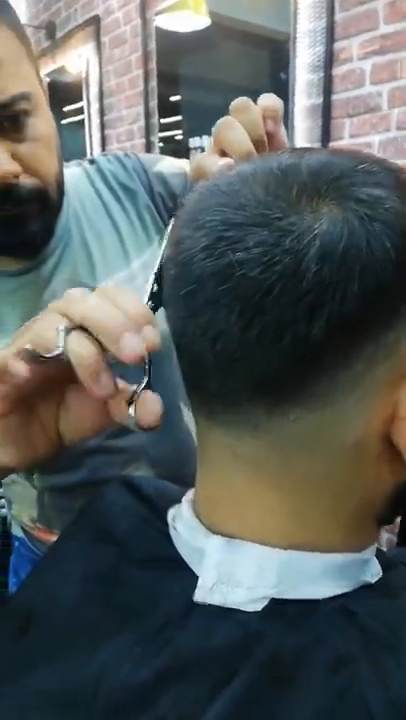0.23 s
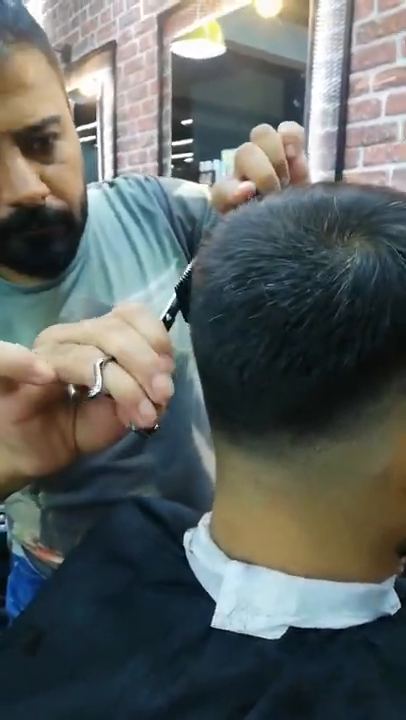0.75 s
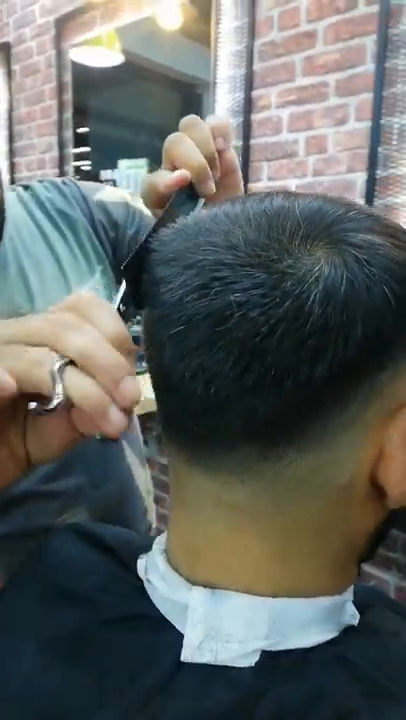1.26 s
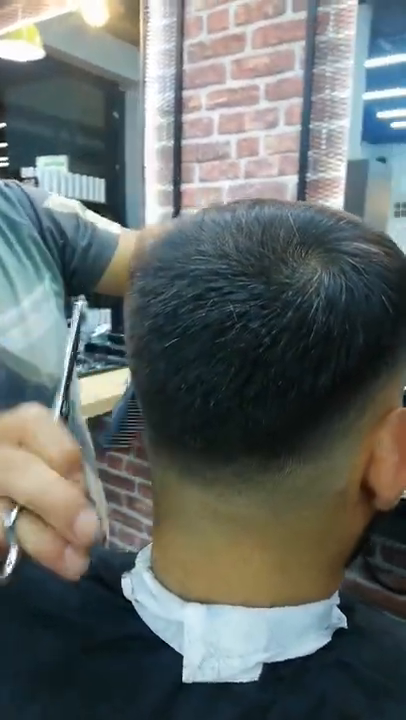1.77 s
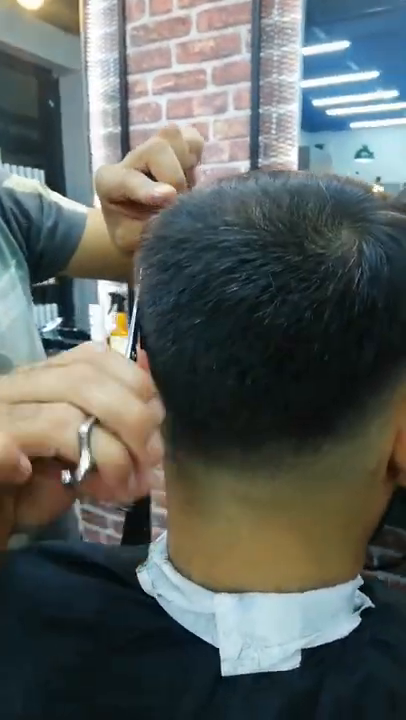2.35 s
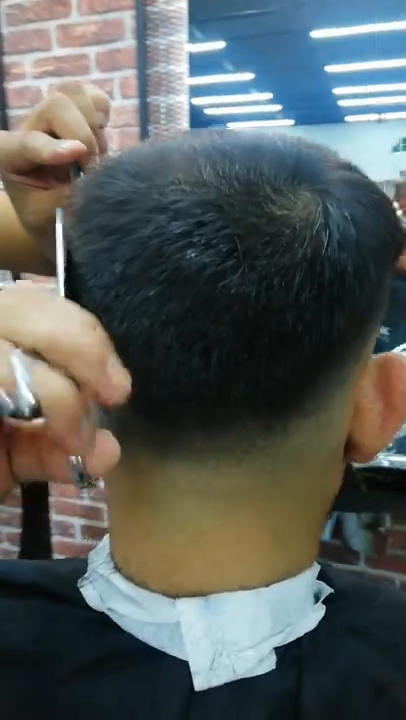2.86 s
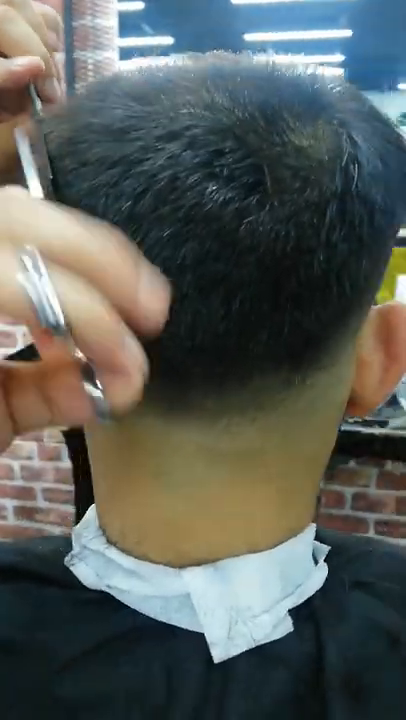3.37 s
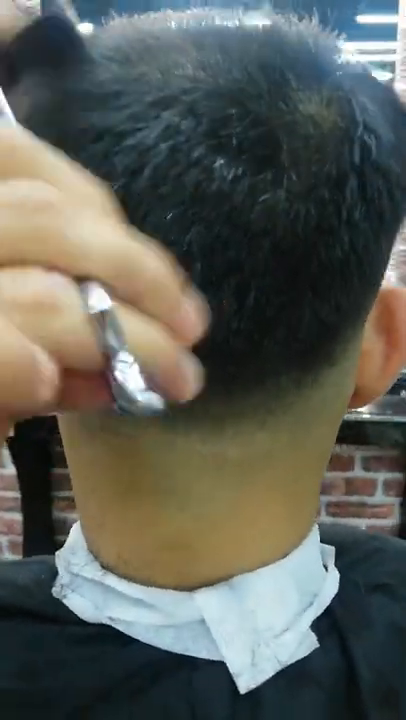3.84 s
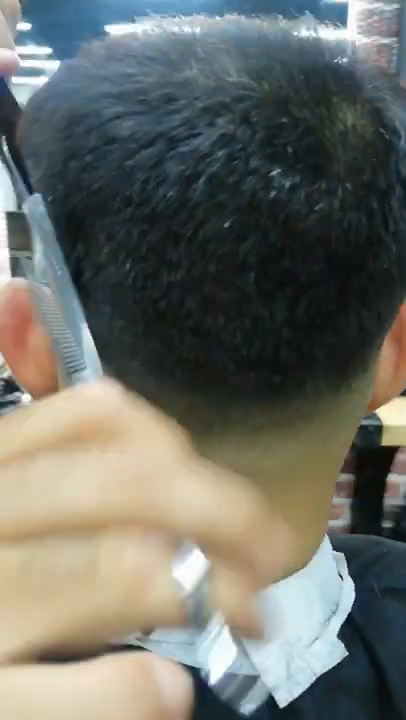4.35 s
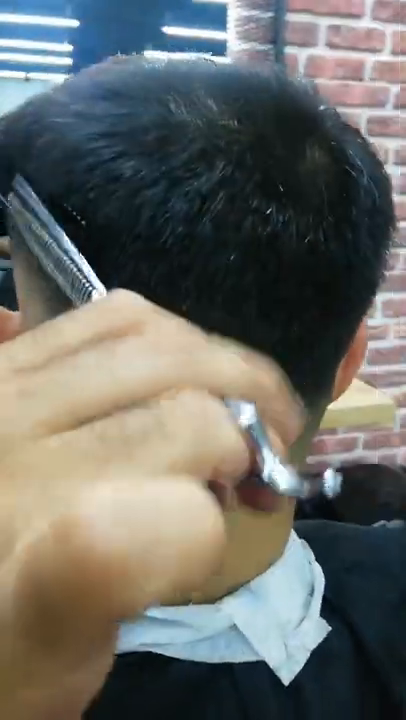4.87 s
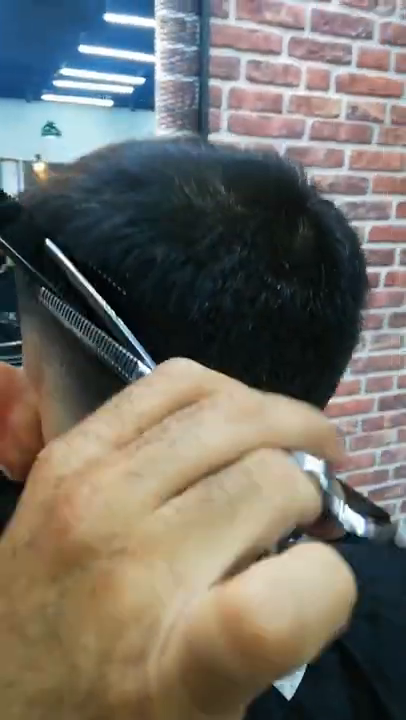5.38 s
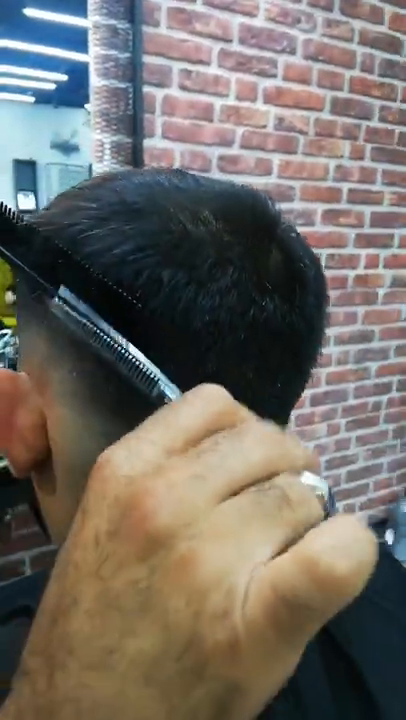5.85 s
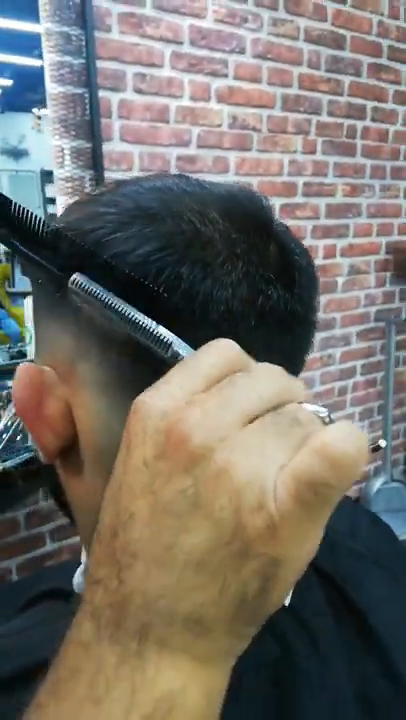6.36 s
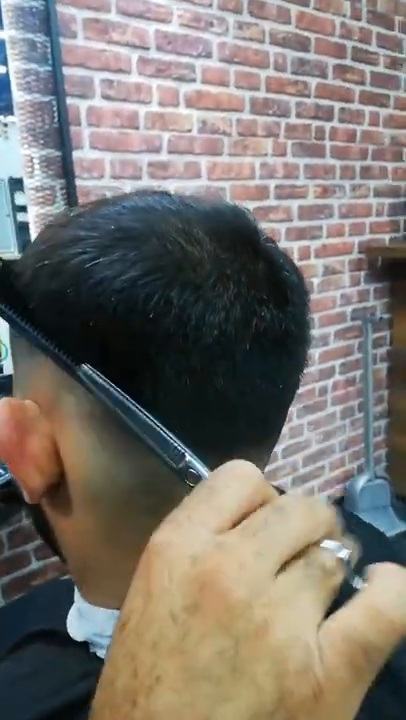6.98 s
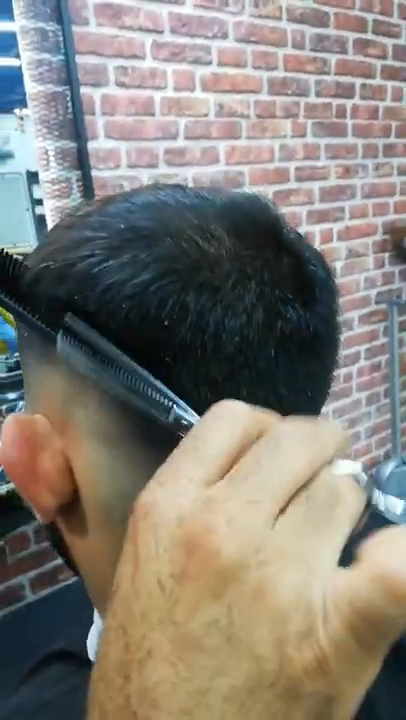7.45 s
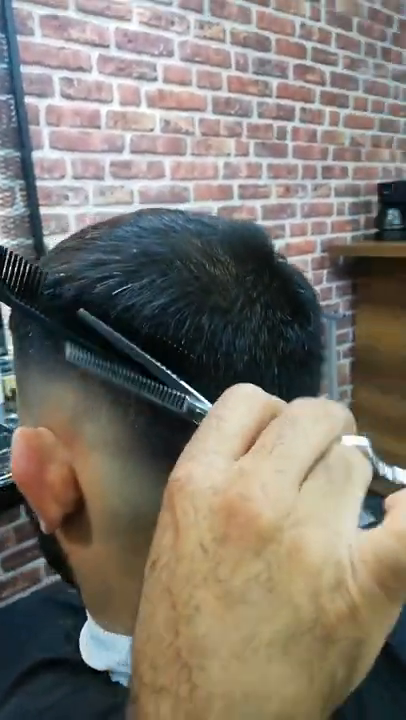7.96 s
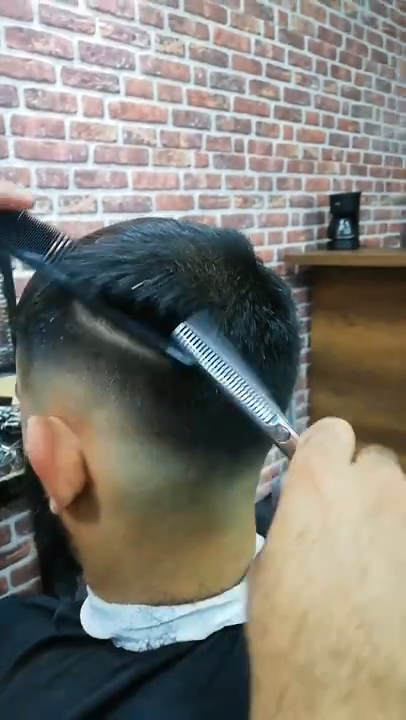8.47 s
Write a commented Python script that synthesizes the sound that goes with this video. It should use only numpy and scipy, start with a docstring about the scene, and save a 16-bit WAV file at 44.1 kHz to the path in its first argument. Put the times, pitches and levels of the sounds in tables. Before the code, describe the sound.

Very close steel scissors, louder on the left, snip in quick regular rhythm: a bright tick as the blades part, a tiny crunch of hair, a metallic clash and a dry handle clack. Around two seconds the blades only scrape in the air, then cutting resumes. A comb rustles faintly. Underneath, a soft steady low hum and room noise; the hard-walled shop adds a brief bright echo.

```python
"""Barber's scissors over a comb

Steel scissors snip hair over a comb, close to a handheld two-microphone recorder in a barbershop.
The blades part with a tick or scrape in the air; in a snip they crunch through hair, clash and knock shut.
Snaps are single impulses with noisy chatter, crunches and scrapes are swells of tiny grains, and both ring
through metallic colours. The comb rustles, and the shop rings briefly with decaying noise.
Beneath lie a steady hum of low sines and filtered noise: rumble, hiss and a wash that swells and fades."""
import sys
import numpy as np
from scipy import signal
from scipy.fft import rfft, irfft, next_fast_len
from scipy.io import wavfile
from scipy.ndimage import uniform_filter1d

SR = 44100
rng = np.random.default_rng(int(sys.argv[2]) if len(sys.argv) > 2 else 0)


def pcm_store(signal):
    """Save signal as 16-bit PCM."""
    levels = np.round(np.clip(np.atleast_2d(signal), -1, 1) * 32767)
    wavfile.write(sys.argv[1], SR, levels.astype(np.int16).T)


N = 384463

# Snips through hair; levels are before each layer's trim. Each row: blades shut in seconds, bite earlier by
# seconds, bite spread in seconds, bite level in dB, blade clash level in dB, handle knock level in dB,
# knock tilt in dB per octave, steel ring in dB, lean to the left in dB.
SNIPS = [(.16, .027, .005, -33.5, -29, -36, 14, -1, 3),
         (0.4716, 0.051, 0.0068, -32.5, -31.5, -36, 3, 0, -3),
         (.7324, 0.019, 0.0077, -36, -27.5, -43.5, 5, -0.5, -1),
         (1.0371, .033, 0.0073, -33.5, -37, -41.5, 5, 5, 2),
         (1.264, .014, 0.0081, -34.5, -39, -58, -3, 2, 10),
         (1.4952, 0.0043, .0045, -36.5, -41, -48.5, -9, -2, 2),
         (2.4892, 0.024, 0.0061, -35, -24.5, -42, 6, 4.5, 7),
         (2.768, .017, 0.0067, -37.5, -37, -44, 0, 3, 2), (3.044, 0.011, 0.0072, -39, -31, -40, 3, -2, -4),
         (3.3349, 0.022, 0.0061, -39, -29, -39.5, 8, 0.5, -3),
         (3.6147, 0.027, 0.0051, -37.5, -29.5, -37.5, 0, -3, -4),
         (3.8286, .0045, 0.0035, -32, -40, -45, -2, -6, -4),
         (4.127, .015, 0.0047, -31, -39, -41.5, -5, -2, 0),
         (4.3514, 0.022, 0.0043, -38.5, -34.5, -41.5, -2, 0, 3),
         (4.7442, 0.0049, 0.0043, -30.5, -35.5, -38.5, 12, -1, -3),
         (5.042, 0.035, 0.0028, -32, -25, -32, -2, 1.5, -3),
         (5.2932, .009, 0.0025, -29.5, -45, -39, -6, 0, 7),
         (5.557, 0.0044, 0.0026, -30.5, -39, -40.5, -5, 5, -1),
         (5.8148, 0.0036, 0.0041, -37.5, -30, -43.5, -6, 2.5, 3),
         (6.0877, 0.0049, .0037, -36, -41, -40, 1, -1, -3),
         (6.3647, 0.023, 0.0039, -38, -28.5, -38.5, -4.5, 7.5, -1),
         (6.6, 0.0081, 0.0032, -28.5, -49, -43.5, -1, 5, 1),
         (7.3274, 0.0015, 0.002, -26, -27.5, -33, 4, 10, -7),
         (7.629, .044, 0.0055, -41, -33, -32, 4.5, -3, -8),
         (7.8887, 0.03, 0.0092, -41, -28, -34, -1, -3, -4),
         (8.1298, 0.022, 0.0043, -33.5, -31, -35, -0.5, -2, -5)]
# Blades working in hair, at the two microphones. Each row: frequency in Hz, relative left and right level in dB.
CUT_COLOUR = [(1480, -23.5, -50), (2970, -16, -23), (3770, -15.5, -24), (5340, -11, -28), (6200, -7.5, -18),
              (6900, -10.5, -26), (7770, -2, -20), (8080, -11.5, -27), (8690, 3, -13), (10350, -10.5, -28),
              (11900, -14, -25), (14100, -23, -31), (15400, -22, -34), (16000, -51, -59)]
# The last hairs are sheared as the blades clash, this many seconds before the stop
CLASH_LEAD_S = .001
# Brightness of the clash (dB per octave) and its extra steel ring (dB)
CLASH_TILT_DB, CLASH_RING_DB = 1, 2


def amp(db):
    """Decibels to gain."""
    return 10 ** (np.asarray(db) / 20)


def evened(x):
    """Scales to rms 1."""
    return x / np.sqrt(np.mean(x ** 2) + 1e-20)


def read(points, hz):
    """Every column of a spectrum table, interpolated over log frequency."""
    f, *columns = np.transpose(points)
    return np.squeeze([np.interp(np.log(hz + 1), np.log(f + 1), c) for c in columns])


def follow(curve):
    """A time curve at every sample."""
    return np.interp(np.arange(N) / SR, *np.transpose(curve))


def add(mix, s, sound):
    """Mixes a two-channel sound in at time s, cut off at the end of the mix."""
    part = mix[:, max(round(s * SR), 0):][:, :sound.shape[1]]
    part += sound[:, :part.shape[1]]


def below(x, edge_hz):
    """The part of a sound under an edge, without phase shift."""
    return signal.sosfiltfilt(signal.butter(6, edge_hz, fs=SR, output="sos"), x)


def wander(slow_hz, fast_hz, count=20):
    """Slow drift of rms 1: sines between two rates in random phase, the slow ones stronger."""
    t = np.linspace(0, N / SR, N // 128)
    rates = np.geomspace(slow_hz, fast_hz, count)
    drift = sum(np.sin(2 * np.pi * (f * t + rng.random())) / np.sqrt(f) for f in rates)
    return follow(np.c_[t, evened(drift)])


def diffuse(spectrum):
    """Shaped room noise of rms 1: alike at both microphones in the bass, unrelated in the treble."""
    # Correlation of the microphones. Each row: frequency in Hz, likeness from -1 to 1.
    likeness = [(100, 1), (180, .8), (300, .85), (450, 0), (650, -.4), (1000, .07), (1600, .1), (4000, 0)]
    # Tonal balance of the microphones. Each row: frequency in Hz, left minus right in dB.
    balance = [(150, 0), (450, -2), (800, 0), (1700, -5), (3200, -2.5), (8000, -7.5)]
    size = next_fast_len(N, real=True)
    hz = np.fft.rfftfreq(size, 1 / SR)
    left, other = rfft(rng.standard_normal((2, size)))
    same = np.clip(read(likeness, hz), -1, 1)
    right = same * left + np.sqrt(1 - same ** 2) * other
    gain = amp(read(spectrum, hz) + np.outer([.5, -.5], read(balance, hz)))
    return evened(irfft(np.array([left, right]) * gain, size)[:, :N])


def background(wash_db=0.88, rumble_db=-2.5, upper_db=-0.6, lumps_db=0.53, rumble_hz=70, upper_hz=172):
    """Lumpy room rumble in two registers, steady room noise, a far wash and a thin hiss, all filtered noise."""
    # Room noise spectrum. Each row: frequency in Hz, relative density in dB.
    floor_spectrum = [(20, -19), (30, -20), (42, 4.5), (56, 5.5), (70, -15.5), (95, 5), (120, -3.5),
                      (145, 0.5), (175, -4), (300, -6.5), (490, -14), (850, -13.5), (3500, -36.5),
                      (7000, -39)]
    # Thin hiss spectrum. Each row: frequency in Hz, relative density in dB.
    hiss_spectrum = [(1500, -0.5), (4000, 4.5), (7000, -4), (9000, 6), (11000, -9), (15000, -11),
                     (16200, -49)]
    # Far wash spectrum. Each row: frequency in Hz, relative density in dB.
    wash_spectrum = [(200, -0.5), (350, 0.5), (520, -7), (800, 3), (1100, 0.5), (1400, 0.5), (1950, 0),
                     (2400, -7), (3300, -16.5), (6000, -42)]
    # Swell of the far wash. Each row: time in seconds, level before trim in dB.
    wash_level = [(0, -52.5), (1.0, -55), (1.9, -55.5), (3.9, -49), (4.6, -50), (6.2, -58.5), (6.72, -54),
                  (7.2, -58.8), (8.72, -58.5)]
    # Swell of the deepest rumble. Each row: time in seconds, level before trim in dB.
    rumble_level = [(0, -60), (1.6, -58), (2.5, -69), (4.55, -54.5), (5.15, -65), (6.6, -56), (7.8, -50),
                    (8.72, -54)]
    # Swell of the upper rumble. Each row: time in seconds, level before trim in dB.
    upper_level = [(0, -55.5), (1.55, -51), (2.6, -51.5), (3.4, -53.5), (4.1, -51), (5.0, -54.5),
                   (6.9, -55.5), (8.72, -54.5)]
    floor_db, hiss_db = -49.5, -62.5

    floor = diffuse(floor_spectrum + [(16000, -63)])
    deep, low = below(floor, rumble_hz), below(floor, upper_hz)
    rumble = amp(follow(rumble_level) + rumble_db + lumps_db * wander(1.5, 3.8)) * evened(deep)
    upper = amp(follow(upper_level) + upper_db + lumps_db * wander(2.6, 7)) * evened(low - deep)
    room = amp(floor_db) * (floor - low)
    wash = amp(follow(wash_level) + wash_db) * diffuse(wash_spectrum)
    hiss = amp(hiss_db) * diffuse(hiss_spectrum)
    return room + rumble + upper + wash + hiss


def hum(waver=0.075, flutter_db=0.47, start_db=-48, rise_db_per_s=0.31):
    """An appliance drones near multiples of the mains frequency; phase (waver, radians) and level drift a little."""
    # Partials of the drone. Each row: frequency in Hz, relative level in dB.
    partials = [(100, -19), (199.9, 7), (300, -22)]
    t = np.arange(N) / SR
    drift = waver * wander(0.267, 3.5)
    drone = sum(amp(db) * np.sin(2 * np.pi * hz * t + drift) for hz, db in partials)
    level_db = start_db + rise_db_per_s * t + flutter_db * wander(0.98, 6.8)
    return amp(level_db) * evened(drone)


def shop(x, level_db=0, build_up=0.0008, size=256):
    """Dense noise reflections from brick and mirrors build up in about a millisecond; each band dies at its own speed."""
    # The shop's echo by band. Each row: frequency in Hz, level in dB, 60 dB decay time in seconds.
    bands = [(500, -8.5, 0.53), (2000, -0.5, 0.39), (4200, -4, 0.33), (6600, -11.5, 0.4), (9200, -11, 0.33),
             (11900, -11, 0.35), (16100, -8, 0.15)]
    taps = rng.standard_normal((2, SR)) * (1 - np.exp(-(np.arange(SR) / SR / build_up) ** 2))
    hz, t, z = signal.stft(taps, SR, nperseg=size)
    db, t60 = read(bands, hz)[:, :, None]
    unit = np.sqrt(2 * np.log(1000) / (t60 * SR))  # decay energy made equal for short and long bands
    decay = np.exp(-np.log(1000) * t / t60)
    tail = signal.istft(z * unit * amp(db + level_db) * decay, SR, nperseg=size)[1]
    return signal.fftconvolve(x[None], tail, axes=1)[:, :N]


def coloured(drive, colour, extra_db=lambda hz: 0, size=1024):
    """Rings a drive through a causal minimum-phase colour; the left channel gets energy 1."""
    hz = abs(np.fft.fftfreq(size, 1 / SR))
    log_gain = np.log(amp(read(colour, hz) + extra_db(hz)))
    response = np.fft.ifft(np.exp(signal.hilbert(log_gain).conj())).real[:, :size // 2]
    sound = signal.fftconvolve(np.atleast_2d(drive), response, axes=1)
    return sound / np.linalg.norm(sound[0])


def steel(ring_db, tilt_db):
    """Colour of one contact: its brightness above 3 kHz, and how hard it drives the blades' main resonance."""
    centre_hz, width_hz = 9320, 370

    def extra_db(hz):
        ring = ring_db * np.exp(-.5 * ((hz - centre_hz) / width_hz) ** 2)
        return ring + tilt_db * np.log2(np.maximum(hz, 3000) / centre_hz)
    return extra_db


def leaning(sound, lean_db):
    """The right microphone is more or less shaded from the scissors."""
    return sound * amp([[0], [-lean_db]])


def comb(grains_per_s=1300, rub=0.58, level_db=2.0, clump_db=4.0, size=500):
    """Tufts of hair flick off the teeth of the comb: sparse grains and friction noise in uneven clumps."""
    # Comb sliding through hair. Each row: time in seconds, level before trim in dB.
    comb_level = [(0, -56.5), (.85, -61), (1.7, -68.5), (3.2, -65.5), (4.2, -58), (4.6, -68.5), (6.1, -73),
                  (6.55, -63.5), (7.05, -71), (7.5, -63), (8.0, -61.5), (8.25, -71), (8.72, -61)]
    flicks = rng.standard_normal(N) * (rng.random(N) < grains_per_s / SR)
    tufts = amp(clump_db * evened(uniform_filter1d(rng.standard_normal(N), size)))
    drive = tufts * (evened(flicks) + rub * rng.standard_normal((2, N)))
    rustle = coloured(drive, CUT_COLOUR, steel(-5, -2.4))[:, :N]
    return amp(follow(comb_level) + level_db) * evened(rustle)


def strokes(rows, colour, grains_per_s, grain_spread_db, rub, skirt, vary_db, level_db):
    """Swells of tiny snaps over smooth friction, each stroke with its own random shift of colour."""
    out, knots_hz = np.zeros((2, N)), np.linspace(2000, 16000, 24)
    t = np.arange(-.04, .04, 1 / SR)
    for s, spread, db, lean_db, tilt_db, ring_db in rows:
        u = t / max(spread, 20 / SR)
        swell = np.exp(-(u / 2) ** 2) + skirt * np.exp(-abs(u) / 3)  # light rub before and after the peak
        sizes = amp(grain_spread_db * np.minimum(rng.exponential(1, len(t)), 3))
        snaps = sizes * rng.choice([-1, 1], len(t)) * (rng.random(len(t)) < grains_per_s / SR)
        drive = swell * (evened(snaps) + rub * rng.standard_normal((2, len(t))))
        shift_db = vary_db * rng.standard_normal(len(knots_hz))
        contact_db = steel(ring_db, tilt_db)
        sound = coloured(drive, colour, lambda hz: contact_db(hz) + np.interp(hz, knots_hz, shift_db))
        length_gain = np.linalg.norm(swell) / swell.max()  # longer strokes carry more energy
        add(out, s + t[0], amp(db + level_db) * length_gain * leaning(sound, lean_db))
    return out


def scrapes(tilt_db=-1.0, ring_db=4.0):
    """Between cuts the empty blades rub along each other, a dense swell of grains in a steely colour."""
    # Bare blades passing in the air. Each row: middle in seconds, spread in seconds, level before trim in dB,
    # lean to the left in dB.
    passes = [(1.677, 0.006, -39.5, 1), (1.758, 0.0042, -34, 1), (1.91, 0.0051, -39, -1),
              (1.997, 0.0043, -37.5, -1), (2.122, 0.0053, -45, 0), (2.219, 0.0048, -47, -3),
              (4.007, 0.0057, -46.5, -4), (4.24, 0.0063, -37.5, 3), (4.461, 0.0047, -40, 1),
              (4.674, 0.0016, -49, -1), (6.795, 0.0065, -41, -8), (6.922, 0.017, -52, -7),
              (8.295, 0.0034, -42, -5), (8.384, .009, -40, -4), (8.517, .0046, -39.5, -2),
              (8.599, 0.012, -41.5, -6)]
    # Bare blades at the two microphones. Each row: frequency in Hz, relative left and right level in dB.
    scrape_colour = [(2000, -15.5, -35), (4000, -19.5, -28), (6000, -12, -17), (6870, -12, -31),
                     (7420, 4.5, -11), (8060, -9.5, -14), (8550, 5.5, -18), (9040, -4.5, -14),
                     (9940, -6, -18), (11400, -14, -25), (11840, 0.5, -11), (13000, -10.5, -21),
                     (15400, -15, -23), (16200, -49, -44)]
    rows = [(*row, tilt_db, ring_db) for row in passes]
    return strokes(rows, scrape_colour, grains_per_s=1800, grain_spread_db=4.0,
                   rub=0.45, skirt=.35, vary_db=2.0, level_db=-.5)


def contact(db, chatter, chatter_s, ring_db, tilt_db, chatter_stretch=2.4, size=500):
    """Edge meets or leaves edge: one snap, then a short decaying noise of chatter, ringing in steel."""
    # Touching edges at the two microphones. Each row: frequency in Hz, relative left and right level in dB.
    tick_colour = [(1200, -43, -48), (2830, -21, -27), (3900, -16, -36), (4260, -15, -20),
                   (5430, -6.5, -22), (6100, -5, -13), (6550, -9, -23), (7800, -1.5, -30), (9300, 5, -9),
                   (10300, -3.5, -20), (11950, -9.5, -25), (13100, -11.5, -24), (15000, -18, -28),
                   (16000, -24, -64)]
    t, hold = np.arange(size) / SR, max(chatter_s, 1 / SR)
    decay = np.exp(-t / (hold * chatter_stretch))
    drive = chatter * np.sqrt(hold * SR) * rng.standard_normal((2, size)) * decay
    drive[:, 0] = 1  # the snap
    return amp(db) * np.sqrt(SR * 0.0053) * coloured(drive, tick_colour, steel(ring_db, tilt_db))


def ticks(level_db=0.2, ring_db=-1.5, ring_vary_db=2, chatter=.052):
    """The edges let go of each other with a snap and faint chatter; the steel ring varies at random."""
    # Blade ticks, mostly as the blades part before a snip. Each row: start in seconds, level before trim in dB,
    # chatter time before stretch in seconds, tilt in dB per octave, lean to the left in dB.
    partings = [(.048, -31.5, 0.00049, -1.5, 2), (0.1091, -33.5, 0.0011, -2.5, 4),
                (0.3405, -35.5, 0.0014, -2.5, -3), (0.6244, -35, 0.0012, -6, 2),
                (.9171, -39, 0.00047, -5, 0), (1.1963, -35, 0.00083, -7.5, 0), (1.7234, -31, 0.00076, 1, 9),
                (1.9808, -40.5, .0014, -2, -3), (2.1865, -37, 0.0017, -2.5, 1),
                (2.3858, -40.5, 0.0011, -2, 3), (2.678, -45.5, .001, 2, -7), (2.726, -41, 0.0008, -5, -2),
                (2.9581, -26.5, .0007, 2.5, 1), (3.2511, -38.5, .0008, -8.5, -3),
                (3.5303, -32, 0.00053, -4.5, -1), (3.7837, -46.5, .0011, -7, -7),
                (4.056, -36, 0.0007, -7, -2), (4.0904, -35, 0.0018, 7, -2), (4.319, -34, 0.0012, 1, -5),
                (4.5197, -45, 0.00088, -3, 1), (4.952, -28.5, 0.0011, -1.5, 12),
                (4.992, -40, .0005, -2, 29), (5.2282, -28, 0.00075, -1.5, -5),
                (5.4962, -28.5, 0.00094, 5, 15), (5.5348, -35, .0007, -1, -2),
                (5.7223, -34.5, 0.0014, 0, 7), (5.766, -29, 0.00036, 0.5, 12),
                (6.0217, -25.5, 0.00049, .5, 1), (6.2755, -28, 0.00085, 3, 12),
                (6.5363, -43, .0008, -5, -4), (6.636, -39, 0.00042, -6, -6), (6.901, -35.5, 0.0017, 5, -6),
                (7.089, -38.5, .0015, 6, -2), (7.1986, -37.5, .00085, -2, -1),
                (7.2918, -36.5, 0.0012, 4, 0), (7.4963, -39, .0004, 2, -14),
                (7.7786, -30.5, 0.00089, 1.5, -3), (8.0409, -30.5, 0.00018, -1.5, 4),
                (8.1668, -39, 0.00062, -10.5, -10), (8.5814, -40.5, .0009, -1, -9)]
    out = np.zeros((2, N))
    for s, db, chatter_s, tilt_db, lean_db in partings:
        tick_ring_db = ring_db + ring_vary_db * rng.standard_normal()
        sound = contact(db + level_db, chatter, chatter_s, tick_ring_db, tilt_db)
        add(out, s, leaning(sound, lean_db))
    return out


def handle_knocks(level_db=2.0, vary_db=2, rattle=0.093, rattle_s=0.0029, size=300):
    """The handles land on their stop: a short, dry clack and a trace of rattle, each in its own random colour."""
    # Handles at the two microphones. Each row: frequency in Hz, relative left and right level in dB.
    knock_colour = [(300, -27, -46), (830, -1.5, -6.5), (1240, -12, -9.5), (1880, 4.5, -0.5),
                    (2420, 6.5, 2.5), (3180, -3, -9.5), (3480, -10, -22.5), (4200, -8.5, -23),
                    (6960, -26.5, -28.5)]
    out, t = np.zeros((2, N)), np.arange(size) / SR
    knots_hz = np.linspace(600, 5000, 12)
    for stop, _, _, _, _, knock_db, tilt_db, _, _ in SNIPS:
        drive = rattle * rng.standard_normal((2, size)) * np.exp(-t / rattle_s)
        drive[:, 0] = 1  # the clack
        shift_db = vary_db * rng.standard_normal(len(knots_hz))

        def extra_db(hz):
            return tilt_db * np.log2(np.clip(hz, 1000, 3500)) + np.interp(hz, knots_hz, shift_db)
        sound = coloured(drive, knock_colour, extra_db)
        add(out, stop, amp(knock_db + level_db) * np.sqrt(SR * 0.0026) * sound)
    return out


def clashes(chatter=0.11, chatter_s=.001, lean_shift_db=-5, level_db=-1.5):
    """The blades snap together as they shut, their lean moved toward the right microphone."""
    out = np.zeros((2, N))
    for stop, _, _, _, clash_db, _, _, ring_db, lean_db in SNIPS:
        sound = contact(clash_db + level_db, chatter, chatter_s, ring_db + CLASH_RING_DB, CLASH_TILT_DB)
        add(out, stop - CLASH_LEAD_S, leaning(sound, lean_db + lean_shift_db))
    return out


def cuts(bite_tilt_db=2.5, shear_spread_s=0.0015, shear_db=-2):
    """Each snip crunches through the tuft in a swell of grains, then shears the last hairs as it shuts."""
    rows = []
    for stop, lead, spread, bite_db, clash_db, _, _, ring_db, lean_db in SNIPS:
        bite = (stop - lead, spread, bite_db, lean_db, bite_tilt_db, ring_db)
        shear = (stop - CLASH_LEAD_S, shear_spread_s, clash_db + shear_db, lean_db,
                 CLASH_TILT_DB, ring_db + CLASH_RING_DB)
        rows += [bite, shear]
    return strokes(rows, CUT_COLOUR, grains_per_s=1300, grain_spread_db=6.0,
                   rub=.5, skirt=0.29, vary_db=3.0, level_db=0.5)


def scene():
    """The scissors, louder at the left microphone, in the humming shop."""
    blades = ticks() + cuts() + clashes() + scrapes() + comb()
    handles = handle_knocks()
    left, right = blades + handles
    right_lead = 27  # samples by which the direct sound reaches the right microphone earlier
    direct = np.array([left, np.roll(right, -right_lead)])
    echo = shop(blades[0] + amp(-10) * handles[0], level_db=0.0)
    return direct + echo + hum() + background()


def record(dry):
    """The recorder's band limit: a steep low-pass at 16.2 kHz."""
    low_pass = signal.firwin(255, 16200, window=("kaiser", 9), fs=SR)
    return signal.oaconvolve(dry, low_pass[None], "same")


dry = scene()
out = record(dry)
pcm_store(out)
```